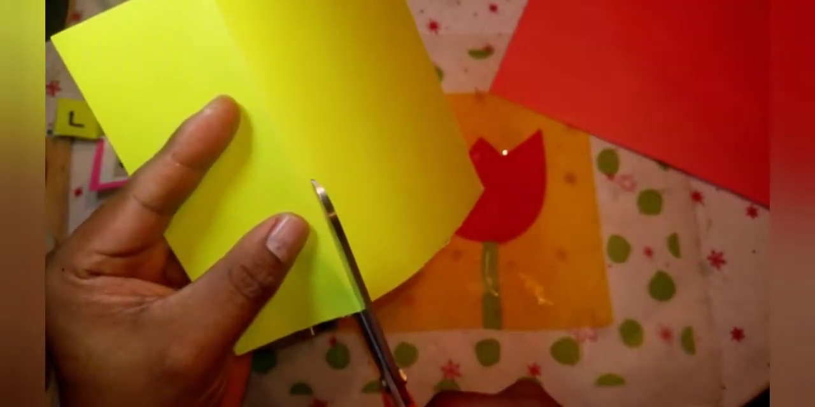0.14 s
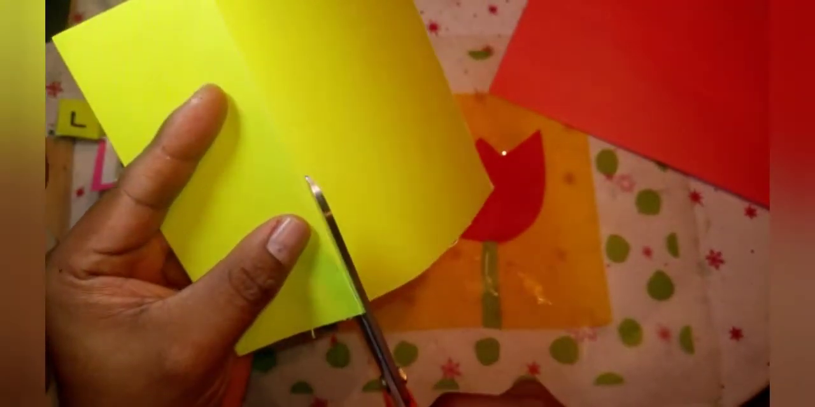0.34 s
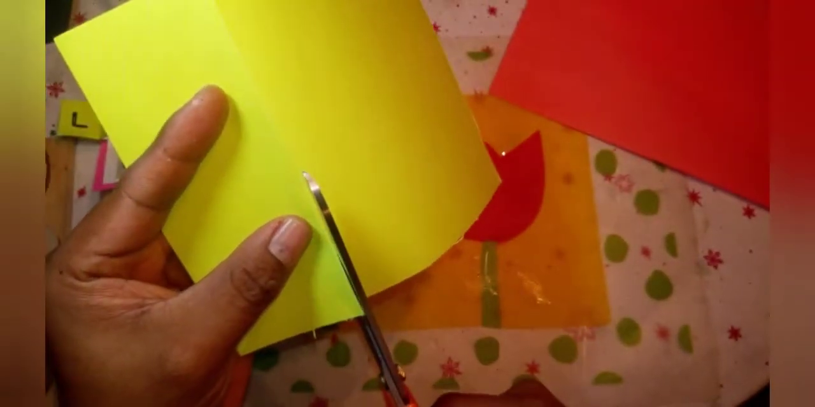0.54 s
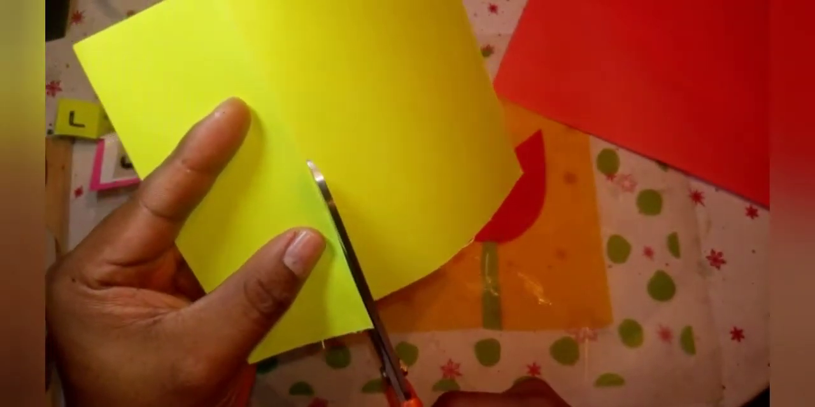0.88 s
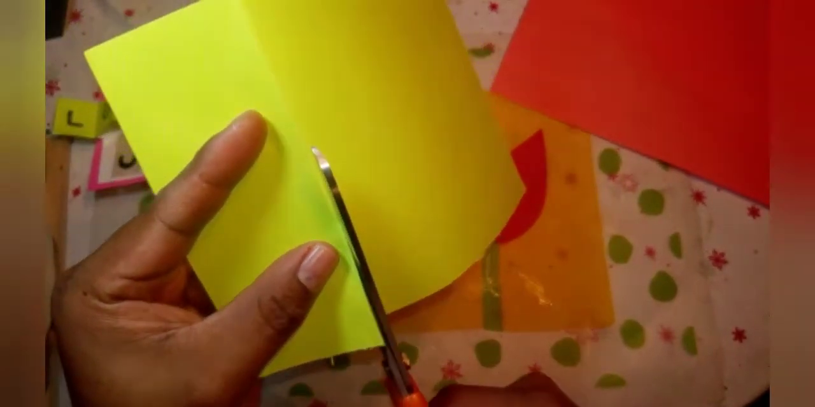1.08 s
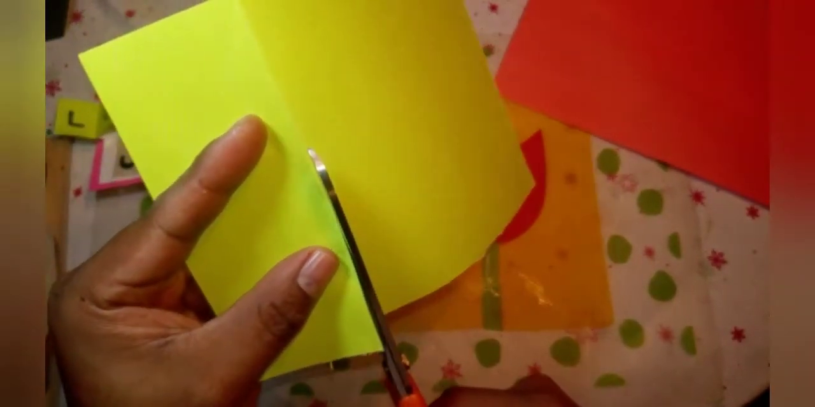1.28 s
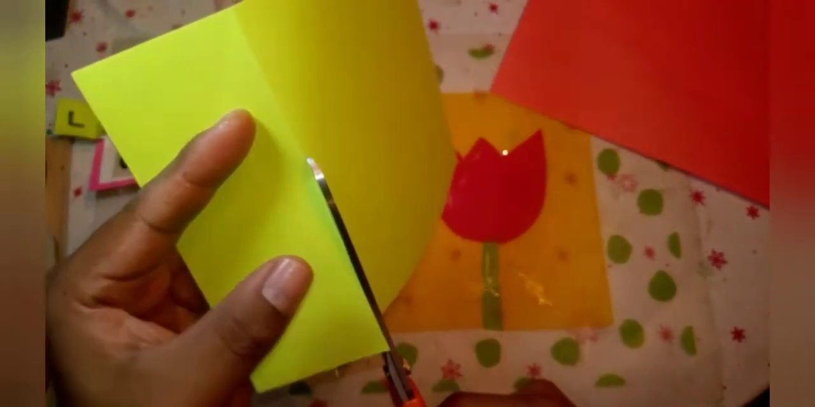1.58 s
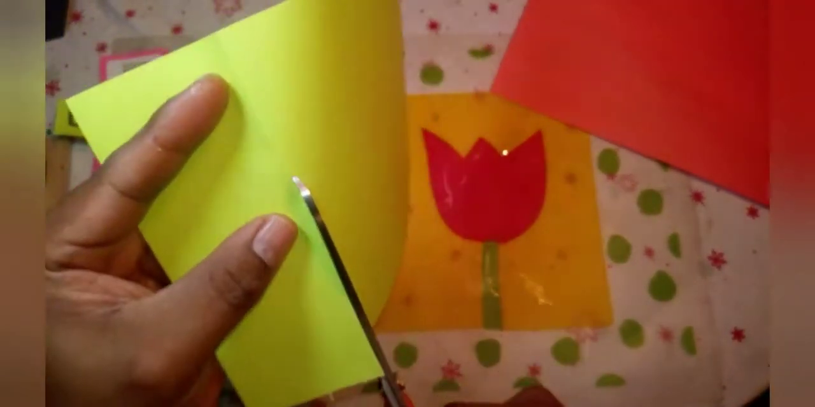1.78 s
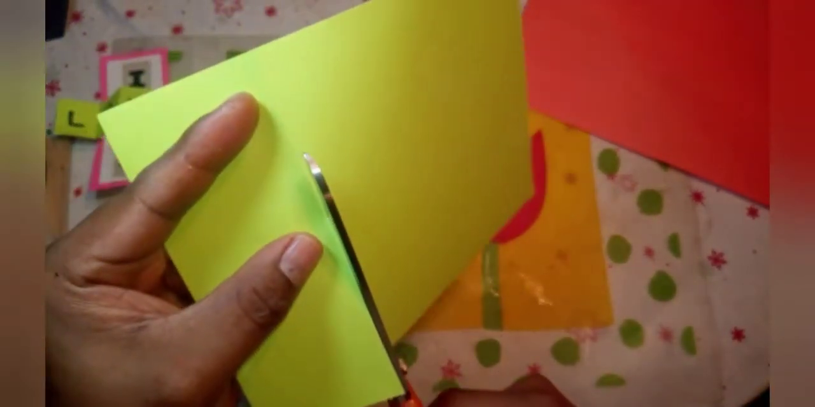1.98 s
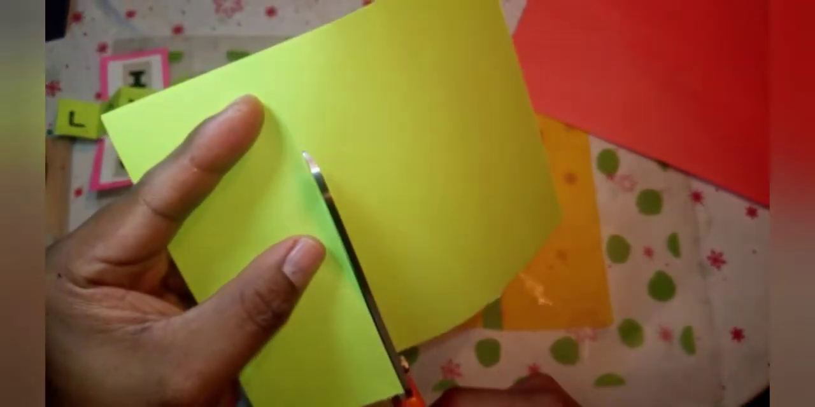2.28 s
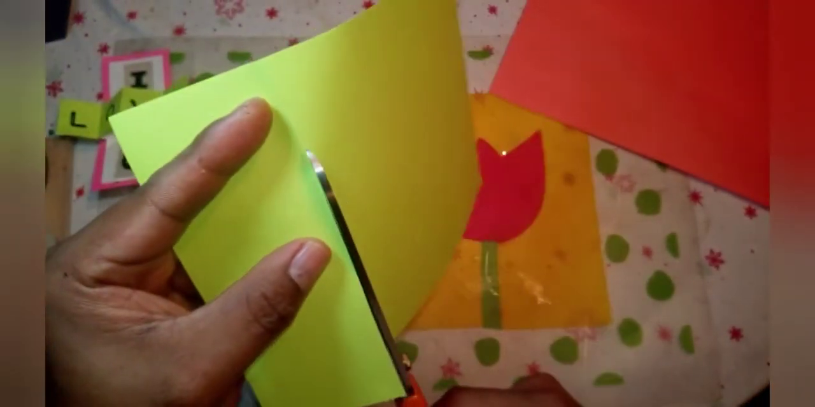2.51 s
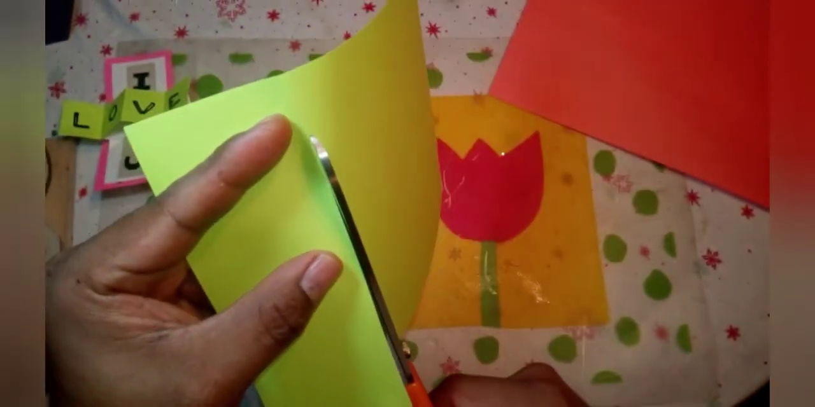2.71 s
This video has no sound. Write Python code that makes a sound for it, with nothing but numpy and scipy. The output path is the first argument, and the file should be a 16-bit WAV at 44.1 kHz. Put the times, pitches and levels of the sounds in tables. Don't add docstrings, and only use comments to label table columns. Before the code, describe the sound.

Close scissors snipping through stiff paper, ragged ripping bursts separated by light metallic blade slides

```python
import sys
import numpy as np
from scipy import signal
from scipy.fft import rfft, irfft
from scipy.io import wavfile

SR = 44100
rng = np.random.default_rng(int(sys.argv[2]) if len(sys.argv) > 2 else 0)


def log_audio(samples):
    frames = np.atleast_2d(samples).T
    limited = np.clip(frames, -1, 1)
    pcm = np.round(limited * 32767).astype(np.int16)
    wavfile.write(sys.argv[1], SR, pcm)


def elevation(decibels):
    levels = np.asarray(decibels, float)
    return 10 ** (levels / 20)


N = 125685
T = np.arange(N) / SR


def rms_one(x):
    return x / np.sqrt(np.mean(x ** 2) + 1e-20)


def drift(rate_hz):
    r = np.exp(-2 * np.pi * rate_hz / SR)
    wander = signal.lfilter([1], [1, -2 * r, r * r], rng.standard_normal(N + SR))
    return rms_one(wander[SR:])


def grit(spread_db):
    clicks = rng.standard_normal(N)
    unevenness = np.minimum(rng.exponential(1, N), 5)
    return rms_one(clicks * elevation(spread_db * unevenness))


def band(low_hz, high_hz):
    return signal.butter(3, [low_hz, high_hz], "band", fs=SR, output="sos")


def colour(x, spectrum, peaks=(), base_db=0, ripple_db=0):
    size = 2 ** 17
    hz = np.arange(size // 2 + 1) * SR / size + 1
    knot_hz, knot_db = np.transpose(spectrum)
    power = elevation(2 * (base_db + np.interp(np.log(hz), np.log(knot_hz), knot_db)))
    for centre, width, db in peaks:
        power = power + elevation(2 * db) / (1 + (2 * (hz - centre) / width) ** 2) ** 2
    modes = np.arange(0, SR, 120)
    power = power * elevation(2 * ripple_db * np.interp(hz, modes, rng.standard_normal(len(modes))))
    cepstrum = irfft(np.log(power) / 2)
    cepstrum[1:size // 2] *= 2
    cepstrum[size // 2 + 1:] = 0
    response = np.exp(rfft(cepstrum))
    return irfft(rfft(x, size) * response)[..., :N]


def three_parts(noise, gains, low_hz, high_hz, *body):
    filters = [signal.butter(3, low_hz, "low", fs=SR, output="sos"), band(low_hz, high_hz),
               signal.butter(3, high_hz, "high", fs=SR, output="sos")]
    *driven, steady = colour(np.vstack([noise * gains, noise]), *body)
    out = 0
    for part, x in zip(filters, driven):
        out = out + signal.sosfilt(part, x) / np.std(signal.sosfilt(part, steady))
    return out


def ringing_clicks(rows, cycles):
    out, t = np.zeros(N + SR), np.arange(2000) / SR
    for start_s, peak_db, ring_hz in rows:
        build = np.sin(np.pi / 2 * np.minimum(t * ring_hz / 2.06, 1)) ** 2
        decay = elevation(peak_db - 60 * t * ring_hz / cycles)
        first = int(start_s * SR)
        out[first:first + 2000] += build * decay * np.sin(2 * np.pi * ring_hz * t)
    return out[:N]


# pitch_hz, density_db (dB per Hz)
ROOM_COLOUR = [(20, -32), (60, -7), (130, -3), (300, -10.5), (1000, -22.5), (7000, -30.5), (9000, -44),
               (15500, -35.5)]


def room():
    return elevation(-71.5) * rms_one(colour(rng.standard_normal(N), ROOM_COLOUR))


# centre_s, level_db
TABLE_BUMPS = [
    (.04, -81),
    (0.171, -64.5),
    (1.2, -69.5),
    (1.35, -65.5),
    (0.369, -59),
    (1.598, -66),
    (1.722, -60),
    (2.342, -59),
    (2.8, -67),
]


def bumps():
    rumble = rms_one(signal.sosfilt(band(45, 167), rng.standard_normal(N)))
    length_s = 0.04
    swell = sum(elevation(db) * np.exp(-((T - centre_s) / length_s) ** 2) for centre_s, db in TABLE_BUMPS)
    return swell * rumble


# start_s, end_s, from_hz, to_hz, level_db, blur (0-1)
PIVOT_SQUEAKS = [
    (0, .68, 3330, 3350, -66, .7),
    (1.0, 1.16, 3500, 3400, -69, 1),
    (1.41, 1.51, 3450, 3950, -72, .9),
    (1.98, 2.2, 3750, 3700, -78, .9),
    (2.38, 2.515, 3260, 3480, -61, .35),
    (2.59, 2.73, 3250, 3200, -65, 1),
    (2.74, 2.87, 3340, 3300, -65, .6),
]


def squeaks():
    out, wobble, flicker = np.zeros(N), drift(200), np.clip(drift(60), -2, 1)
    wobble_hz, flicker_db, edge_s, octave_db = 130, 2, 0.02, -14
    for start_s, end_s, from_hz, to_hz, level_db, blur in PIVOT_SQUEAKS:
        glide = np.clip((T - start_s) / (end_s - start_s), 0, 1) ** 2
        pitch_hz = from_hz + (to_hz - from_hz) * glide + blur * wobble_hz * wobble
        phase = 2 * np.pi * np.cumsum(pitch_hz) / SR
        edge = np.clip(np.minimum(T - start_s, end_s - T) / edge_s, 0, 1)
        strength = edge * elevation(level_db + 2 * blur * flicker_db * flicker)
        out += strength * (np.sin(phase) + elevation(octave_db) * np.sin(2 * phase))
    return out


# centre_s, length_s, pitch_hz, level_db
EDGE_SINGS = [(0.734, .03, 1700, -62.5), (0.792, 0.068, 3780, -72), (0.839, 0.013, 2265, -50.5),
              (0.851, .04, 2660, -55), (0.933, 0.035, 3100, -61), (0.942, 0.037, 2750, -58.5),
              (0.906, .05, 5170, -59.5), (1.04, 0.037, 2200, -79), (1.043, 0.03, 2916, -62.5),
              (1.66, 0.07, 6180, -60.5), (1.63, 0.041, 2100, -64.5), (1.88, 0.052, 3260, -61.5),
              (1.88, 0.041, 2754, -69.5), (2.523, 0.013, 2180, -54), (2.548, .035, 3190, -65),
              (2.565, 0.029, 4680, -65), (2.57, 0.056, 6670, -71), (2.73, 0.059, 1520, -78),
              (2.805, .02, 894, -75), (2.66, 0.019, 1410, -70), (2.725, 0.046, 2010, -68.5),
              (2.72, 0.017, 5120, -70)]


def sings():
    out, rub = np.zeros(N), rng.standard_normal(N)
    r = np.exp(-np.pi * 110 / SR)
    for centre_s, length_s, pitch_hz, level_db in EDGE_SINGS:
        line = signal.lfilter([1, 0, -1], [1, -2 * r * np.cos(2 * np.pi * pitch_hz / SR), r * r], rub)
        out += elevation(level_db) * np.exp(-((T - centre_s) / length_s) ** 2) * rms_one(line)
    return out


# time_s, level_db, low_db (below 1.2 kHz) and brightness_db (both re level)
BLADE_SLIDES = [
    [(0, -53, -14, -3.5), (.035, -70.5, 1, -1), (.08, -88, -13, -12), (.11, -73, 1, 6.5),
     (.26, -67.5, -0.5, -4), (.5, -68.5, 4.5, 0)],
    [(.78, -68, 0, -17), (.817, -69, 0, 6), (.821, -48.5, -11.5, -5), (.96, -50.5, -16, -4),
     (1.03, -62.5, -24, -3.5), (1.13, -82.5, -11, -7)],
    [(1.44, -93, -33, 19), (1.53, -59.5, 9, -7), (1.6, -66.5, -6, 11.5), (1.64, -59, -11.5, 3),
     (1.685, -61, -0.5, -11), (1.74, -52, -1.5, -9), (1.84, -60.5, -10.5, -0.5), (1.88, -50.5, -15, -2.5),
     (2.02, -68, -5.5, -9.5)],
    [(2.5, -73, -5, -12), (2.515, -62, -12, -12), (2.55, -49.5, -19, -5.5), (2.63, -60, -1.5, -4.5),
     (2.7, -62.5, -6, -10), (2.85, -75, -2, -9)],
]
# pitch_hz, width_hz, level_db
EDGE_RESONANCES = [(2200, 230, -6), (2870, 130, -24.5), (4745, 110, -3.5), (5750, 580, -9), (6770, 250, -8)]
# pitch_hz, density_db (dB per Hz)
EDGE_COLOUR = [(120, -35), (200, -32.5), (509, -9.5), (851, -21.5), (2860, 3), (4120, -6.5), (6520, -1.5),
               (11900, -39.5), (16000, -29)]


def slides():
    out = 0
    patches = elevation(1.8 * (drift(17) + np.array([drift(15) for _ in range(3)])))
    for rows in BLADE_SLIDES:
        time_s, level_db, low_db, brightness_db = np.transpose(rows)
        ramp = np.minimum((T - time_s[0]) / 0.015, (time_s[-1] - T) / 0.05)
        fade = np.clip(ramp + 1, 0, 1) ** 2
        parts_db = (level_db + low_db, level_db, level_db + brightness_db)
        gains = fade * patches * elevation([np.interp(T, time_s, db) for db in parts_db])
        out = out + three_parts(grit(3), gains, 1200, 4200, EDGE_COLOUR, EDGE_RESONANCES, -6, 1.5)
    return out


# start_s, peak_db, pitch_hz
FLAP_THUDS = [
    (2.3285, -24, 420),
    (.689, -38, 480),
    (.612, -42, 436),
    (1.52, -41, 517),
    (1.4, -48, 400),
]


def thuds():
    return ringing_clicks(FLAP_THUDS, cycles=6)


# start_s, peak_db, pitch_hz
PAPER_CRACKS = [(.5562, -22, 6400), (.5600, -21, 6400), (.5645, -19, 6200), (2.057, -52, 7200),
                (.38, -45, 2700), (.39, -46, 3300), (1.636, -44, 4800), (1.692, -43, 2800),
                (2.787, -56, 2200), (1.376, -38, 6500), (1.4, -40, 6000)]


def cracks():
    return ringing_clicks(PAPER_CRACKS, cycles=22)


# start_s, peak_db, pitch_hz
FIBRE_SNAPS = [(.092, -61, 1630), (.185, -48, 1500), (.284, -38, 1520), (.421, -42.5, 1520),
               (.447, -40, 1190), (.447, -40, 1480), (.557, -34.5, 1430), (.59, -35, 640), (.59, -36, 1620),
               (.637, -38, 724), (.686, -37, 698), (.689, -33.5, 1100), (.686, -33.5, 1560),
               (.822, -48, 1040), (1.182, -47, 1470), (1.217, -46, 1170), (1.326, -31, 2120),
               (1.326, -39.5, 930), (1.357, -34, 534), (1.388, -47, 375), (1.389, -44, 1530),
               (1.52, -33.5, 1280), (1.7, -52, 1453), (1.712, -37, 617), (1.755, -44, 2150),
               (2.2, -37.5, 510), (2.2, -38, 1513), (2.226, -45, 1518), (2.256, -39.5, 640),
               (2.284, -54, 890), (2.322, -28, 1110), (2.324, -52, 2310), (2.36, -26.5, 2202),
               (2.385, -39, 2500)]


def snaps():
    return ringing_clicks(FIBRE_SNAPS, cycles=29)


# start_s, peak_db, thump_db and brightness_db (both re peak), swell_ms
FIRST_STROKE = [(0.089, -43, -22, -17.5, 4.9), (0.137, -39.5, -57, -13.5, 8.4), (0.181, -42, -16, -16, 12),
                (0.222, -39, -40, -13.5, 10.4), (0.282, -32, -53, -12, 5.1), (0.34, -34, -19, -8.5, 6.5),
                (0.396, -37, -42, -13, 3.8), (0.418, -36, -15, -11, 3.5), (0.445, -30.5, -28.5, -16, 4.4),
                (0.479, -35, -21, -13, 4), (0.519, -30.5, -9.5, -11.5, 6.1), (0.554, -27, -11.5, -10, 6.6),
                (0.583, -29, -10, -10, 4.8), (0.611, -32, -5, -17, 4.2), (0.633, -27.5, -8, -13, 2.6),
                (0.678, -28, -9.5, -14, 6.9)]
SECOND_STROKE = [(1.159, -51, -14, -5, 3.5), (1.178, -37, -17, -14, 8.9), (1.213, -31.5, -11.5, -12, 6.1),
                 (1.244, -32, -13.5, -15, 6.4), (1.276, -29.5, -17, -11, 4.3),
                 (1.318, -26, -16.5, -18, 7.1), (1.352, -29, -15.5, -16.5, 4.9), (1.383, -39, -5, -14, 6.1),
                 (1.518, -30, -7.5, -14, 3.83), (1.699, -33.5, -19, -9, 4.7), (1.752, -40.5, -6, -31, 1.7)]
THIRD_STROKE = [
    (2.198, -30, -9, -21, 4.8),
    (2.221, -39, -5, -12.5, 7.6),
    (2.254, -28.5, -9, -16.5, 4.6),
    (2.281, -25, -8, -13, 4.2),
    (2.32, -21.5, -8.5, -21.5, 6),
    (2.355, -30.5, -11, -9.5, 6),
    (2.382, -35, -9, -29, 2.7),
]
# pitch_hz, width_hz, level_db
SHEET_RESONANCES = [(1518, 130, -1), (2118, 150, -1), (2570, 120, -1), (6530, 440, -10), (7180, 860, -12.5),
                    (15300, 3000, -38)]
# pitch_hz, width_hz, level_db
FLAP_RESONANCES = [
    [(660, 260, -6), (1250, 300, -10), (3060, 870, -4.5)],
    [(560, 300, -7), (1230, 350, -5), (2200, 300, -6)],
    [(600, 320, -4), (1200, 300, -14), (3100, 500, -8)],
]
# pitch_hz, density_db (dB per Hz)
SHEET_COLOUR = [(120, -73), (200, -38), (480, -8), (700, 1.5), (950, -18), (1400, -6), (2250, -0.5),
                (3760, -8.5), (6520, -5), (8270, -20), (16000, -41.5)]


def tear_gains(rows):
    gains = np.zeros((3, N))
    rustle = elevation(-18 + np.array([[-5], [0], [-6]]))
    for start_s, peak_db, thump_db, brightness_db, swell_ms in rows:
        swell_s = max(swell_ms, 0.5) / 1000
        u = (T - start_s) / swell_s + 1
        rise = np.sin(np.pi / 2 * np.clip(u / 2.47, 0, 1)) ** 2
        late = np.maximum(u - 1.8, 0)
        fall = np.exp(-(late / 1.387) ** 1.045)
        tail = rustle * np.exp(-late * swell_s / 0.038)
        parts_db = np.array([[thump_db - 6.5], [-11.5], [brightness_db]])
        gains += rise * (fall + tail) * elevation(peak_db + parts_db)
    gains[0] = np.interp(T - 0.002, T, gains[0])
    return gains * elevation(3 * np.array([drift(120) for _ in gains]))


def tears():
    out = 0
    for stroke, flap in zip((FIRST_STROKE, SECOND_STROKE, THIRD_STROKE), FLAP_RESONANCES):
        for rows in (stroke[::2], stroke[1::2]):
            gains = tear_gains(rows)
            body = SHEET_COLOUR, SHEET_RESONANCES + flap, -6, 3.4
            out = out + three_parts(grit(2.2), gains, 1100, 4000, *body)
    return out


def scene():
    mono = tears() + snaps() + cracks() + thuds() + slides() + sings() + squeaks() + bumps() + room()
    treble = signal.sosfilt(signal.butter(4, 8000, "high", fs=SR, output="sos"), mono)
    side = elevation(-8) * np.roll(treble, 37) * np.clip(drift(20), 0, 1)
    return np.array([mono + side, mono - side])


def roll_off(x):
    return signal.sosfilt(signal.butter(12, 16190, fs=SR, output="sos"), x)


def record(dry):
    limit = signal.cheby2(10, 50, 16450, fs=SR, output="sos")
    mix = signal.sosfilt(limit, dry)
    return roll_off(mix)


dry = scene()
out = record(dry)
log_audio(out)
```